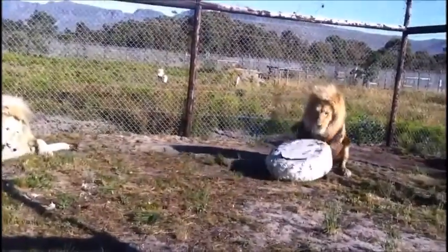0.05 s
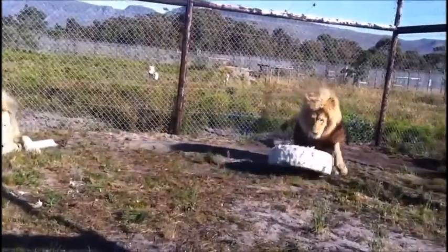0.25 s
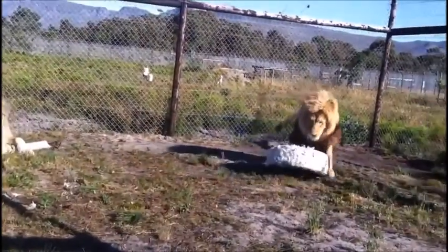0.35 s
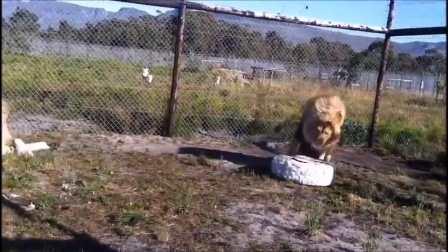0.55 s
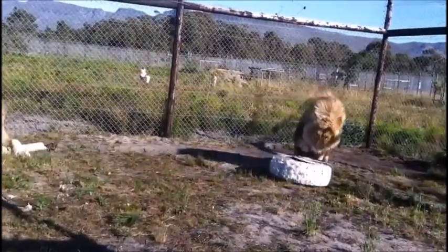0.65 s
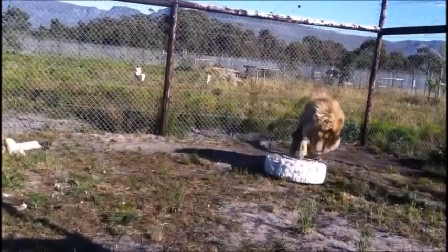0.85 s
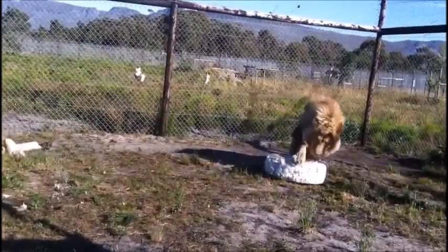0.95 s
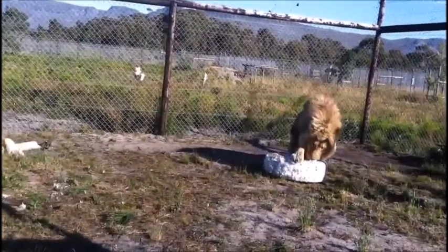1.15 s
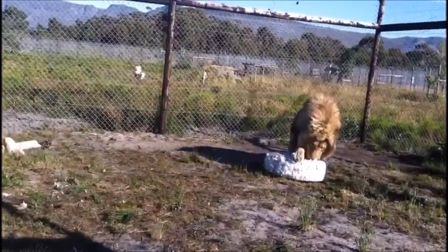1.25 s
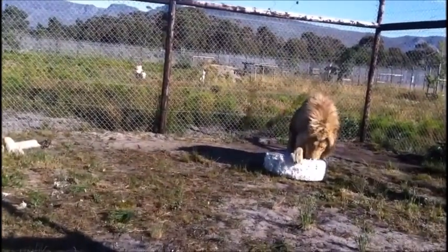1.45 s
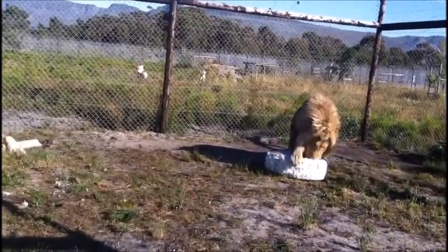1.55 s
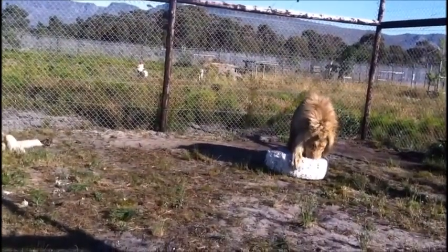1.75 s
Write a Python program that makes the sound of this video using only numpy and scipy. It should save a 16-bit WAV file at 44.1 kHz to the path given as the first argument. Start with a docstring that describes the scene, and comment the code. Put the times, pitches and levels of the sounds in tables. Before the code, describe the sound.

A heavy plastic tub thuds and scrapes over gritty ground as a small bird chirps faintly.

```python
"""A lion scuffs a heavy plastic tub over gritty earth in an open enclosure, then drops and shoves it.
The hollow shell thuds, stones click under it and the rim snaps and rattles. The tub rocks and
scrapes on, shuddering as it crushes grit; after a second, paws pad softly on it and claws tick.
Behind it all a small bird repeats a tick and an arched chirp, and a thin whistle hangs far off
in the light wind."""
import sys
import numpy as np
from scipy import signal
from scipy.fft import rfft, irfft
from scipy.io import wavfile

SR = 44100
rng = np.random.default_rng(int(sys.argv[2]) if len(sys.argv) > 2 else 0)


def transcribe(u):
    """Save the signal u as a 16-bit wav file named by the first command-line argument.

    u: samples, shape (n,) or (channels, n), limited to [-1, 1]; the rate is SR.
    q: integer samples, one column per channel.
    """
    v = np.clip(np.atleast_2d(u).T, -1, 1)
    q = np.round(v * 32767).astype(np.int16)
    wavfile.write(sys.argv[1], SR, q)


N = 79380
TIME = np.arange(N) / SR

# hits on the tub: t/s, peak level/dB, centre of the hit's colour f/Hz
TUB_HITS = [(0.001, -53.5, 175), (0.04, -50, 186), (0.061, -53.5, 170), (0.157, -42, 193),
            (0.2025, -36, 286), (0.2242, -24, 277.6), (0.2403, -27, 324), (0.2609, -29.5, 217),
            (0.269, -29.5, 328), (0.312, -42, 180), (0.337, -45.5, 257), (0.371, -36.5, 173),
            (0.382, -31, 162), (0.391, -34.5, 600), (0.397, -25, 166), (0.405, -30.5, 157),
            (0.417, -28.5, 274), (0.423, -51, 135), (0.435, -47, 120), (0.451, -42.5, 305),
            (0.482, -51, 172), (0.512, -42, 157), (0.537, -42.5, 172), (0.729, -51.5, 160),
            (0.749, -52, 169), (0.785, -44, 125), (0.8016, -46, 270), (0.8094, -34, 270),
            (0.8162, -35.5, 150), (0.8637, -43.5, 254), (0.868, -45, 125), (0.968, -45, 135.6),
            (1.06, -56, 327), (1.085, -54, 125), (1.124, -54.5, 204), (1.146, -53, 122), (1.175, -55, 135),
            (1.202, -61.5, 187), (1.219, -55.5, 104), (1.502, -54, 154), (1.577, -56.5, 122),
            (1.624, -54, 147)]
# modes of the plastic shell: f/Hz, relative level/dB, nominal t60/s
TUB_MODES = [(106, -0.5, 0.07), (133.2, -1.5, 0.13), (168.8, -2, 0.14), (191.3, 1, 0.11),
             (255.3, -3.5, 0.082), (288.5, 2.5, 0.12), (377.4, 2, 0.1), (458, -13.5, 0.06),
             (532, -11.5, 0.15), (638, -4.5, 0.054), (1066, -7.5, 0.13), (1320, 1.5, 0.079),
             (1836, 2.5, 0.073)]
# knocks of the rim and of claws on it: t/s, ring level/dB, f/Hz, t60/s, crack level/dB
RIM_KNOCKS = [(0.227, -35.5, 640, 0.042, -56), (0.2555, -35, 644, 0.12, -30),
              (0.2651, -43, 1050, .018, -40), (0.3115, -40.5, 610, 0.038, -70),
              (0.3726, -24.5, 756, 0.011, -15), (0.4, -38, 1290, 0.023, -32), (0.406, -36, 1250, .014, -42),
              (0.413, -41.5, 1074, .018, -47), (1.4321, -37.5, 721, 0.0064, -72),
              (1.707, -56.5, 1930, .012, -59)]
# stones clicking under the tub: t/s, level/dB, f/Hz
STONE_CLICKS = [(0.121, -40.5, 3500), (0.2037, -33, 4550), (0.2097, -32, 6300), (0.2228, -29, 2940),
                (0.2266, -29, 5070), (0.232, -41, 9100), (0.2562, -29, 3270), (0.264, -30, 6800),
                (0.27, -33, 4700), (0.379, -27, 8100), (0.4, -37, 4270), (0.4525, -67, 6260),
                (0.466, -53, 5140), (0.689, -39, 3120), (0.7799, -41, 2600), (0.8685, -39.5, 4790),
                (1.313, -49, 4740), (1.6795, -40.5, 4980)]
# drags of tub and paws: t/s, length/s, shudder level/dB, shudder f/Hz, crunch level/dB, hiss level/dB
DRAGS = [(0.0, 0.095, -65.5, 175, -65, -68), (0.11, 0.025, -57.5, 196, -67, -62.5),
         (0.148, 0.042, -62, 500, -60.5, -68.5), (0.181, 0.014, -54, 283, -77, -60.5),
         (0.198, 0.035, -49.5, 322, -51.5, -51), (0.227, 0.031, -37.5, 453, -59, -54.5),
         (0.253, 0.021, -41, 515, -44.5, -50), (0.286, 0.066, -52.5, 350, -58, -61.5),
         (0.349, 0.036, -50.5, 664, -55, -77), (0.367, 0.0071, -53, 705, -47, -49),
         (0.389, 0.024, -45, 1010, -48, -58.5), (0.421, 0.015, -43.5, 510, -58.5, -70),
         (0.434, 0.042, -51.5, 325, -66, -57), (0.481, 0.075, -64, 334, -62, -67),
         (0.56, 0.07, -73.5, 580, -68.5, -66), (0.635, 0.067, -55.5, 630, -65, -58),
         (0.707, 0.053, -57.5, 597, -62.5, -67.5), (0.756, 0.031, -69, 428, -55, -65.5),
         (0.799, 0.022, -45.5, 365, -53.5, -70), (0.828, 0.025, -51, 215, -68, -92),
         (0.865, 0.0088, -57, 600, -56.5, -48.5), (0.882, 0.01, -58, 1320, -84, -72),
         (0.897, 0.099, -83, 397, -67.5, -96), (1.103, 0.12, -72.5, 237, -68, -68),
         (1.685, 0.029, -64.5, 1710, -67, -67), (1.723, 0.055, -79, 1180, -70, -68)]
# EQ of the coarse crunch: f/Hz, relative level/dB
CRUNCH_EQ = [(80, 8), (300, 9), (700, 5), (1200, 4.5), (1550, -2), (1900, 4), (2400, -0.5), (3100, 1),
             (4000, -9.5), (8000, -13.5)]
# EQ of sand and pebbles: f/Hz, relative level/dB
GRIT_EQ = [(500, -61), (1500, -10), (2300, 4), (3200, 6), (3700, 3), (4700, 9.5), (5400, 6), (7500, 4),
           (9000, 8.5), (10500, -1.5)]
# bird calls: arch start t/s, arch level/dB, arch top f/Hz, tick level/dB, tick f/Hz
BIRD_CALLS = [(0.046, -64.5, 4330, -80, 5300), (0.485, -64, 4240, -67, 5240), (0.64, -59, 4640, -60, 5280),
              (0.786, -60.5, 4390, -54, 5080), (0.930, -60, 4320, -58, 5270),
              (1.078, -60.5, 4320, -56, 5290), (1.224, -58.5, 4310, -56.5, 4950),
              (1.369, -60.5, 4290, -59, 5100), (1.52, -62.5, 4400, -66.5, 5040),
              (1.669, -63, 4400, -65, 5200)]
# breakpoints of the far whistle: t/s, f/Hz, level/dB
WHISTLE_CURVE = [(0.5, 1419, -76), (0.601, 1446, -71.5), (0.72, 1450, -90), (0.951, 1342, -75),
                 (1.02, 1339, -74), (1.088, 1406, -69.5), (1.16, 1380, -72), (1.22, 1368, -85),
                 (1.30, 1373, -68.5), (1.40, 1365, -71.5), (1.53, 1376, -71), (1.611, 1364, -82.5),
                 (1.8, 1373, -75)]
# EQ of the open air: f/Hz, relative level/dB
AIR_EQ = [(25, 13), (50, 16), (150, -6.5), (400, -2), (930, -3.5), (1300, -7), (1600, -7.5), (3200, -9.5),
          (4300, -8), (5500, -11), (9250, -10.5), (10500, -15.5)]


def tub_thuds():
    """Each hit rings the shell's modes, most of all those near its colour; the ground soon chokes them."""
    out, t = np.zeros(N), TIME[:SR // 3]
    choked_gain, choke_s, rise_cycles = from_db(-12.5), 0.0059, 0.81
    slope_db_per_octave, knee_octaves, spread_db = 30, 0.3, 2
    rings, mode_hz = tub_rings(t, t60_scale=0.91), np.array(TUB_MODES)[:, 0]
    choke = choked_gain + (1 - choked_gain) * np.exp(-(t / choke_s) ** 2 / 2)
    for s, peak_db, contact_hz in TUB_HITS:
        colour_db = -slope_db_per_octave * np.hypot(np.log2(mode_hz / contact_hz), knee_octaves)
        mode_gains = from_db(colour_db + spread_db * rng.standard_normal(len(mode_hz)))
        attack = 1 - np.exp(-(t * contact_hz / rise_cycles) ** 2)  # softer contact, slower attack
        thud = mode_gains @ rings * choke * attack
        add(out, s, from_db(peak_db) * thud / np.abs(thud).max())
    return out


def tub_rings(t, t60_scale):
    """The shell's modes as decaying sines, one a row."""
    hz, db, t60 = np.transpose(TUB_MODES)[:, :, None]
    return from_db(db) * np.sin(2 * np.pi * hz * t) * decay(t, t60 * t60_scale)


def rim_knocks():
    """The rim gives one short ring and cracks on its first crest."""
    out, t = np.zeros(N), TIME[:SR // 10]
    attack_s = 0.0004
    for s, db, hz, t60, crack_db in RIM_KNOCKS:
        ring = np.sin(2 * np.pi * hz * t) * decay(t, t60) * (1 - np.exp(-t / attack_s))
        add(out, s, from_db(db) * ring / np.abs(ring).max())
        add(out, s + 1 / (4 * hz), from_db(crack_db) * crack())
    return out


def crack(spike_s=0.00003, splinter_db=-22, splinter_s=0.0008):
    """A bright transient: one spike with a brief splintering tail."""
    t = TIME[:SR // 100]
    splinters = from_db(splinter_db) * rng.standard_normal(len(t)) * np.exp(-t / splinter_s)
    return butter(np.exp(-t / spike_s) + splinters, "high", hz=3000)


def stone_clicks(crack_db=-4.5):
    """Single stones click under the tub, each a crack on top of a tiny ring."""
    out = np.zeros(N)
    for s, db, hz in STONE_CLICKS:
        add(out, s, from_db(db) * stone_ring(hz))
        add(out, s, from_db(db + crack_db) * crack())
    return out


def stone_ring(hz, t60_cycles=10.7):
    """A small stone rings for only a few cycles."""
    t = TIME[:SR // 50]
    return np.sin(2 * np.pi * hz * t) * decay(t, t60_cycles / hz)


def scrapes(attack_s=0.0057, release_s=0.0085, shudder_octaves=0.73):
    """Dragging crushes grit, which crunches, hisses and sets the tub shuddering."""
    out = np.zeros(N)
    shell = tub_rings(TIME[:SR // 3], t60_scale=0.63).sum(0)
    ringing_slips = rms_one(signal.fftconvolve(grains(), shell)[:N])
    dead_slips = grains()
    crunch = equalise(grains(), CRUNCH_EQ)
    sand = equalise(grains(per_s=12000, spread_db=2.5), GRIT_EQ)
    crackle = equalise(pebbles(), GRIT_EQ)
    for s, length, shudder_db, hz, crunch_db, hiss_db in DRAGS:
        attack = np.clip((TIME - s) / attack_s, 0, 1)
        release = np.exp(-np.maximum(TIME - s - length, 0) / release_s)
        pitched = unit_band(ringing_slips, hz, shudder_octaves)
        unpitched = from_db(-6) * unit_band(dead_slips, hz, shudder_octaves)
        shudder = rms_one(pitched + unpitched)
        pebble_share = np.interp(hiss_db, [-64, -52], [0, 0.65])  # only hard strokes stir the pebbles
        hiss = np.sqrt(1 - pebble_share) * sand + np.sqrt(pebble_share) * crackle
        layers = from_db(shudder_db) * shudder + from_db(crunch_db) * crunch + from_db(hiss_db) * hiss
        out += attack * release * layers
    return out


def pebbles(clicks_per_s=2000):
    """A crackle of twelve pebbles, each at its own pitch; the high ones click most often."""
    out, pitches_hz = np.zeros(N), np.geomspace(2200, 10000, 12)
    for hz in pitches_hz:
        clicks = grains(per_s=clicks_per_s * hz / pitches_hz.sum(), spread_db=4)
        out += np.sqrt(hz) * signal.fftconvolve(clicks, stone_ring(hz))[:N]
    return out


def grains(per_s=5000, spread_db=3.4):
    """Grit as random clicks of uneven size."""
    sizes = from_db(spread_db * np.minimum(rng.exponential(1, N), 4)) * rng.choice([-1, 1], N)
    return sizes * (rng.random(N) < per_s / SR)


def bird():
    """Each call is a quick falling tick, then a raspy arched chirp, bent a little differently each time."""
    out = np.zeros(N)
    tick_s, tick_lead_s, tick_fall_hz = 0.012, 0.028, 1000
    arch_s, crest_share, dip_db = 0.037, 0.47, 2.5
    rasp_hz, rasp_db, rasp_per_s = 75, 2.4, 700
    tick, arch = np.linspace(0, 1, int(tick_s * SR)), np.linspace(0, 1, int(arch_s * SR))
    swell = np.abs(np.sin(np.pi * arch))
    for s, db, top_hz, tick_db, tick_hz in BIRD_CALLS:
        rise_hz, fall_hz = np.array([420, 620]) * (1 + 0.1 * rng.standard_normal(2))
        bend_hz = np.where(arch < crest_share, rise_hz / crest_share ** 2, fall_hz / (1 - crest_share) ** 2)
        pitch = top_hz - bend_hz * (arch - crest_share) ** 2 + rasp_hz * drift(rasp_per_s)[:len(arch)]
        arch_db = db + dip_db * (1.5 - swell ** 2)  # eases off at the top
        add(out, s, from_db(arch_db) * np.sqrt(swell) * tone(pitch))
        tick_pitch = tick_hz + tick_fall_hz * (0.5 - tick)
        add(out, s - tick_lead_s, from_db(tick_db) * np.sin(np.pi * tick) ** 2 * tone(tick_pitch))
    return out * from_db(rasp_db * drift(rasp_per_s))


def yard_reverb(x, wet_db=-19.5, t60=0.36, predelay_s=0.022):
    """Faint, dull scatter off the ground and the fence."""
    t = TIME[:SR // 2]
    tail = rng.standard_normal(len(t)) * decay(t, t60) * (t > predelay_s)
    wet = signal.fftconvolve(x, tail / np.sqrt(np.sum(tail ** 2)))[:N]
    return from_db(wet_db) * butter(wet, "low", hz=2310)


def far_whistle(waver_hz=4.3):
    """A thin whistle of nearly steady pitch that swells and fades."""
    s, hz, db = np.transpose(WHISTLE_CURVE)
    pitch = np.interp(TIME, s, hz) + waver_hz * drift(per_s=40.4)
    return np.sqrt(2) * from_db(np.interp(TIME, s, db)) * tone(pitch)


def wind(air_db=-63, flicker_db=1, murmur_db=-74.5, gust_db=3.5):
    """A bed of open-air hiss with a soft, gusty murmur underneath."""
    air = from_db(air_db + flicker_db * drift(per_s=13.8)) * equalise(rng.standard_normal(N), AIR_EQ)
    murmur = unit_band(rng.standard_normal(N), hz=146, octaves=0.57)
    return air + from_db(murmur_db - gust_db * drift(per_s=9.7)) * murmur


def from_db(db):
    """Decibels to gain."""
    return 10 ** (np.asarray(db) / 20)


def rms_one(x):
    """Normalise to unit rms."""
    return x / np.sqrt(np.mean(x ** 2) + 1e-20)


def add(out, s, x):
    """Mix a sound in at s seconds."""
    i = max(int(s * SR), 0)
    out[i:i + len(x)] += x[:max(N - i, 0)]


def decay(t, t60):
    """An envelope that falls 60 dB in t60 seconds."""
    return np.exp(-np.log(1000) * t / t60)


def tone(hz):
    """A sine that follows a pitch curve."""
    return np.sin(2 * np.pi * np.cumsum(hz) / SR)


def drift(per_s):
    """A random modulator gliding between values of spread 1."""
    return np.interp(TIME * per_s, np.arange(2048), rng.standard_normal(2048))


def butter(x, kind, hz, order=1):
    """A gentle low-, high- or band-pass."""
    return signal.sosfilt(signal.butter(order, hz, kind, fs=SR, output="sos"), x)


def unit_band(x, hz, octaves):
    """Band-pass so many octaves to either side of a centre; unit rms."""
    return rms_one(butter(x, "band", [hz / 2 ** octaves, hz * 2 ** octaves], order=2))


def equalise(x, curve):
    """Shape a noise with an EQ curve; unit rms."""
    hz, db = np.transpose(curve)
    bin_hz = np.maximum(np.arange(N // 2 + 1) * SR / N, 1)
    gain = from_db(np.interp(np.log(bin_hz), np.log(hz), db))
    return rms_one(irfft(rfft(x) * gain, N))


def scene():
    """Tub and bird with the yard's reverb, over the far whistle and the wind, in mono."""
    near = tub_thuds() + rim_knocks() + stone_clicks() + scrapes() + bird()
    return (near + yard_reverb(near) + far_whistle() + wind())[None]


def record(dry, high_cut_hz=10650):
    """The microphone rolls off the deep bass; the top is cut steeply."""
    thin = butter(dry, "high", hz=107, order=3)
    return signal.sosfilt(signal.ellip(10, 0.2, 70, high_cut_hz, fs=SR, output="sos"), thin)


dry = scene()
out = record(dry)
transcribe(out)
```